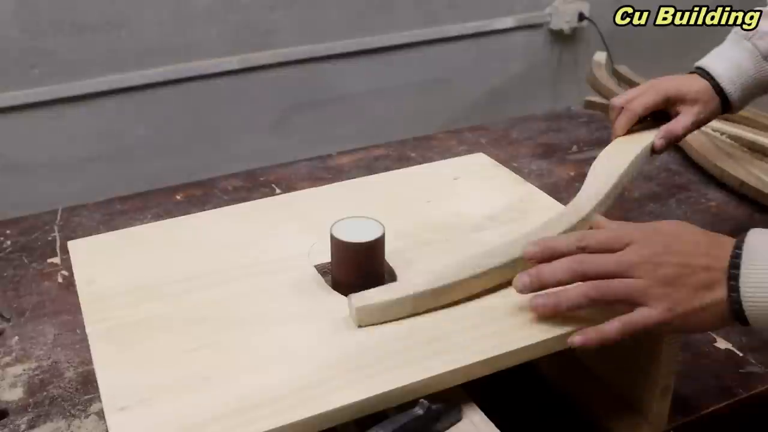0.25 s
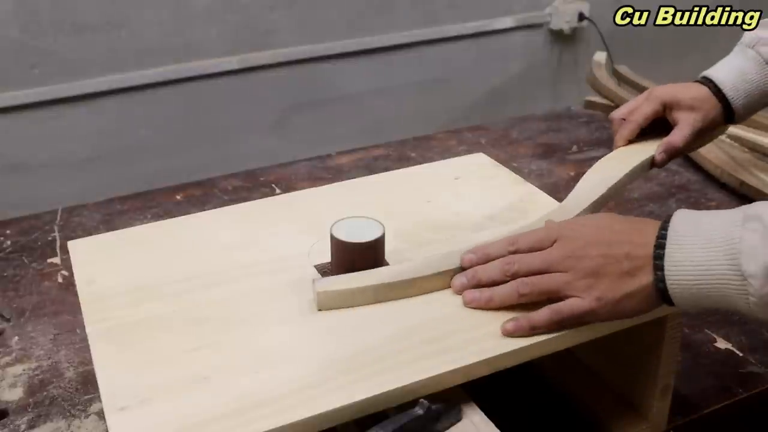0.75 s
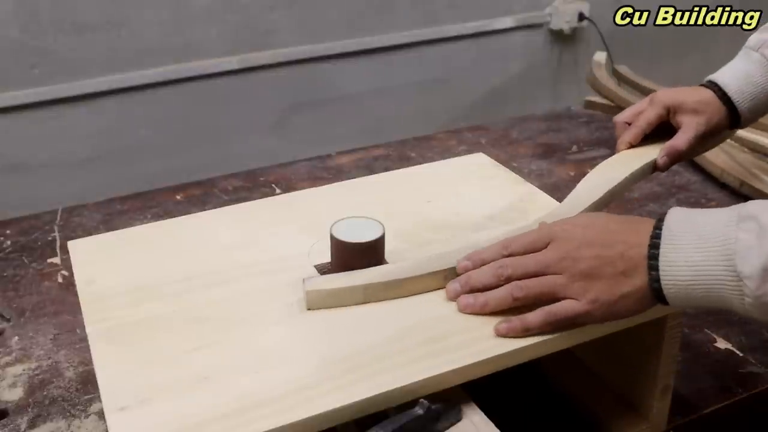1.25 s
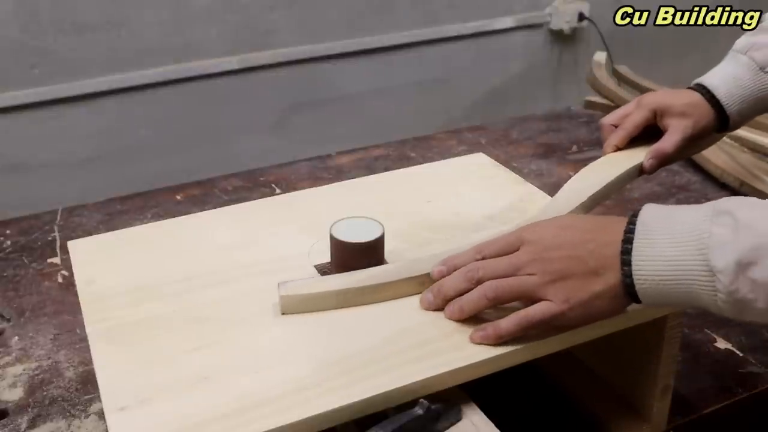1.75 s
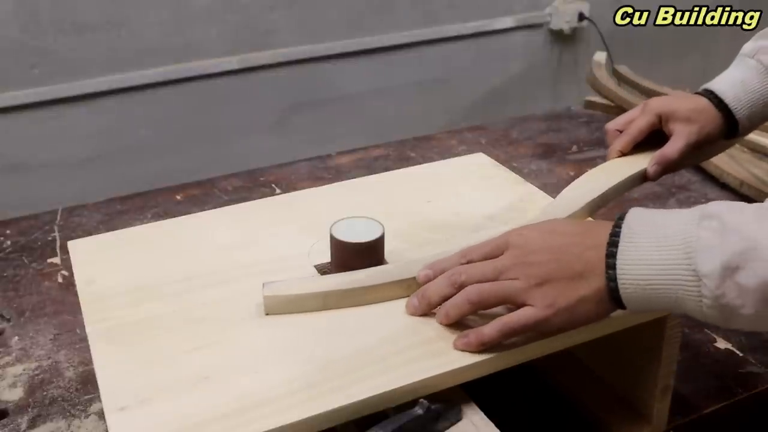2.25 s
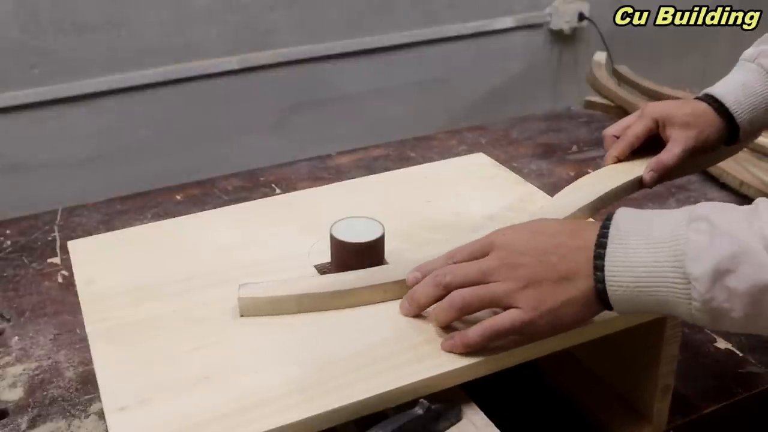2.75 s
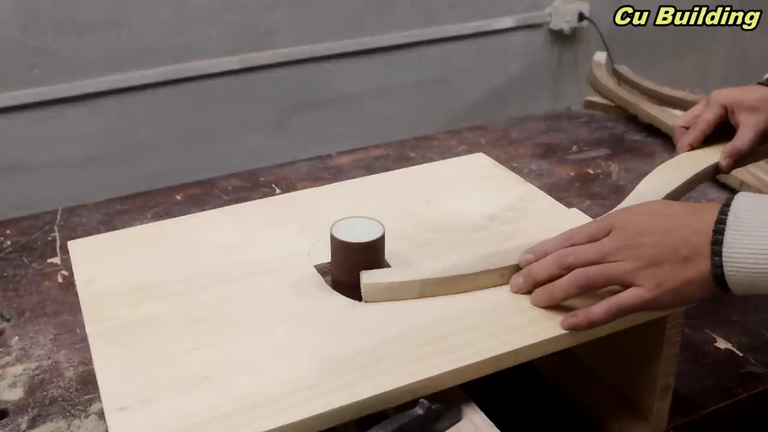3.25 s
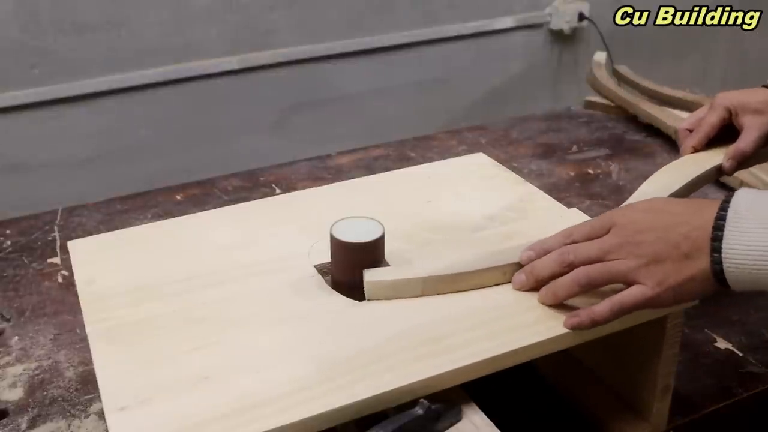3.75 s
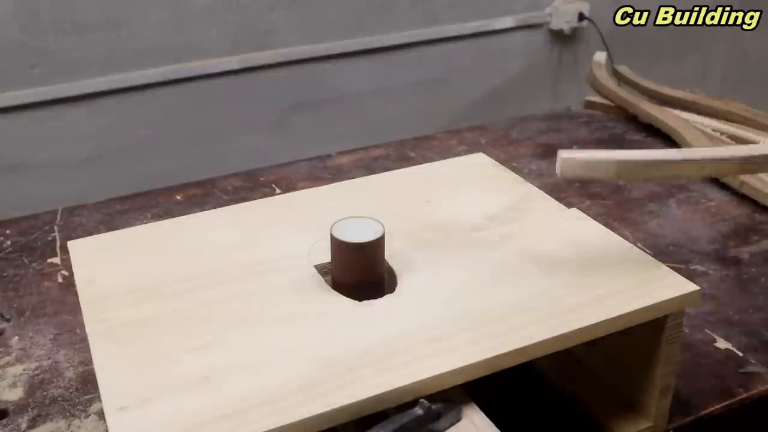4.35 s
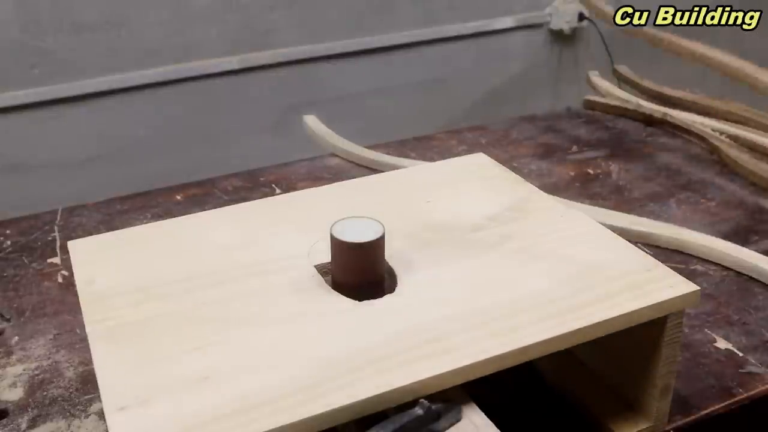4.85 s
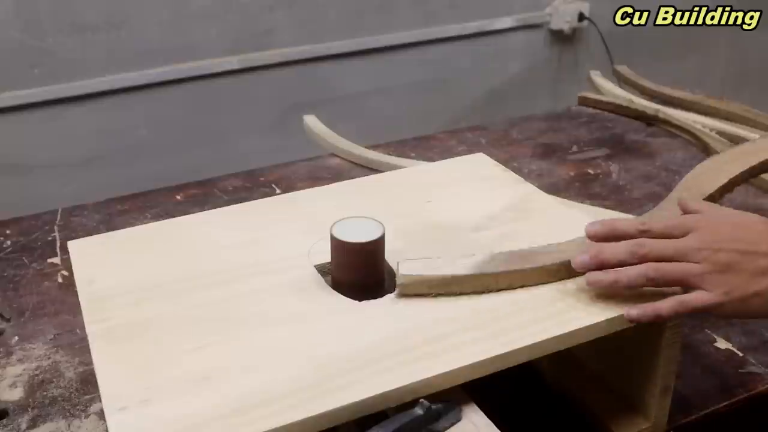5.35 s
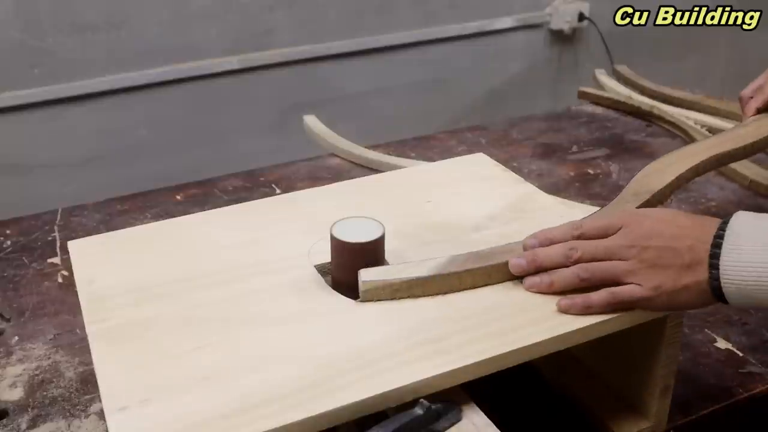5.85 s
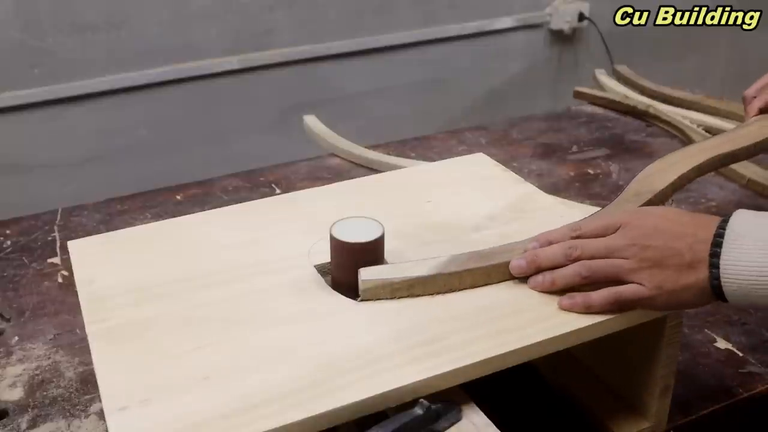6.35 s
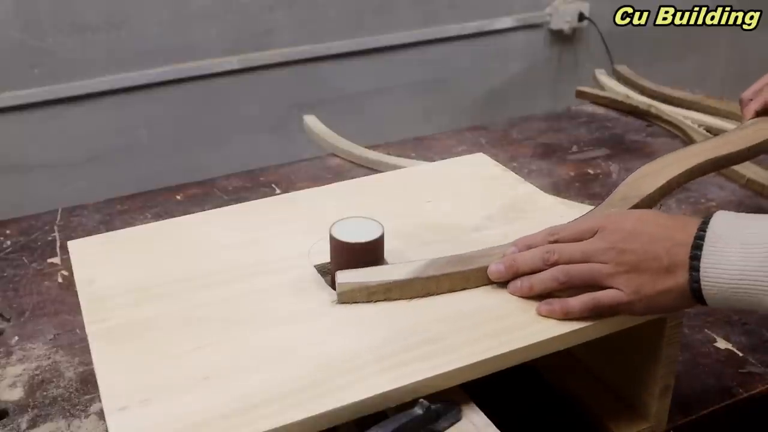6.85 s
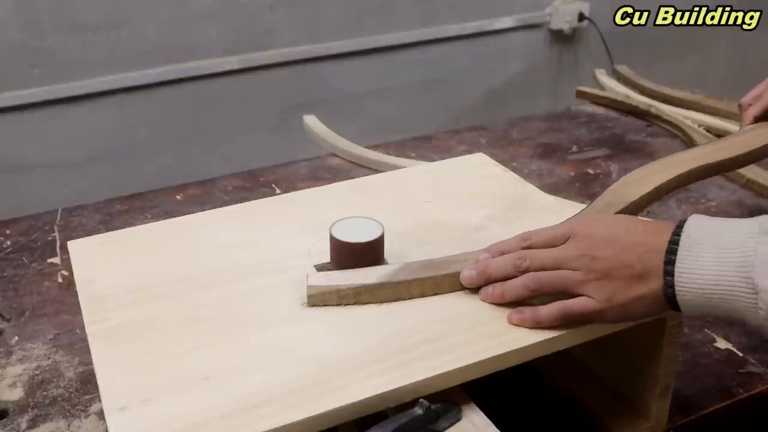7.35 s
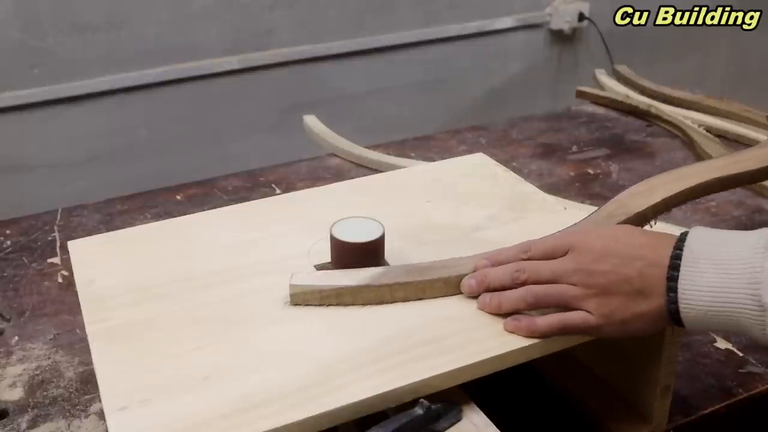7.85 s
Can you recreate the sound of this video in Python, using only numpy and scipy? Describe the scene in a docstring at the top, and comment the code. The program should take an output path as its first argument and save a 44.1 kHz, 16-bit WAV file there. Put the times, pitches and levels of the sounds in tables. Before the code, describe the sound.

High motor whine and fan hiss in a workshop; two wooden pieces are sanded in turn, the first tossed clattering onto others.

```python
"""A sanding drum whines in a workshop, on a fast router motor under a plywood table; its fan rushes and hisses.
Wood slides and bumps over the table, then two curved pieces are pressed against the drum in turn:
the motor sags, its overtones swell with load, and noise through wood resonances makes the grit rasp.
The first piece clatters onto a pile, as clicks ringing wood modes; the second is pushed so hard it chatters.
Tones follow one shaft angle; air and rumble are banded noise. The recorder's gain control ducks loud sound."""
import sys
import numpy as np
from scipy import signal
from scipy.io import wavfile
from scipy.ndimage import uniform_filter1d

SR = 44100
rng = np.random.default_rng(int(sys.argv[2]) if len(sys.argv) > 2 else 0)


def persist_wave(psi):
    """Save psi, clipped to +-1, as 16-bit WAV."""
    counts = np.round(np.clip(psi, -1, 1) * 32767).astype(np.int16)
    wavfile.write(sys.argv[1], SR, np.atleast_2d(counts).T)


N = 357651

IDLE_HZ, LOADED_HZ = 460, 400   # shaft turns per second, running free and under full load


def motor(angle, speed, load, push):
    """Unbalance hums once a turn; bearing balls pass 3.7 times a turn and mix with the shaft rate into side lines."""
    # Strong lines swell and fade as the shaft rate carries them through resonances of table and room.
    # Each row: shaft rate in turns per second, level in dB ahead of any push or waver.
    hum_levels = [(398, -44), (419, -33), (422, -28), (426, -29), (430, -32), (436.5, -41.5), (438, -38),
                  (440, -31), (445, -28.5), (448, -30), (454.5, -45), (458, -35), (460, -32.5)]              # unbalance, once a turn
    twice_levels = [(398.0, -36.5), (403.0, -28.5), (422.0, -36), (436.0, -33.5), (439.0, -48),
                    (445.0, -40.5), (460.0, -51.5)]          # twice a turn
    bearing_levels = [(398.0, -38), (416.0, -28), (426.0, -35), (436.5, -34), (438.0, -41.5), (442.0, -44),
                      (445.0, -37.5), (448.0, -32), (458.0, -33.5), (460.0, -34.5)]      # the balls passing
    overtone_levels = [(398.0, -36.5), (409.0, -45.4), (426.0, -44), (448.0, -53.5), (451.0, -43),
                       (460.0, -48)]    # twice the ball rate
    whistle_levels = [(398.0, -34.5), (409.0, -47), (422.0, -34), (426.0, -46), (445.0, -37), (460.0, -45)]      # three times the ball rate
    low_side_levels = [(398.0, -48), (426.0, -46.8), (436.0, -40.5), (445.0, -43), (451.0, -52.5),
                       (460.0, -56)]    # ball rate minus shaft rate
    high_side_levels = [(398.0, -52), (430.0, -46.8), (433.0, -59), (445.0, -40), (448.0, -43),
                        (460.0, -44.5)]  # twice the ball rate minus shaft rate
    # Brief dips and swells of the bearing's lines. Each row: start in seconds, length in seconds,
    # change of the whine (ball rate) in dB, change of the whistle in dB.
    waver_rows = [(-.1, .35, 0.5, -6), (0.208, .83, -9, 0), (1.3, .18, 2.5, 0), (2.63, .22, -9, 5.5),
                  (4.58, .48, 1, -7), (5.03, 0.24, -4.5, 3), (5.26, .4, 0, 4), (5.606, 0.63, -4.5, 1.5),
                  (6.724, 0.18, -10, 0), (7.25, 0.4, -5.5, -3)]
    # Resonances of the motor casing. Each row: frequency in Hz, width in Hz, lift in dB.
    casing_modes = [(1176, 35, 11.5), (1260, 16, 11), (1297, 29, 12.5), (1400, 20, 7.5), (2307, 29, 8),
                    (2278, 31, 10), (2576, 205, 15.5), (3205, 42, 9), (3260, 48, 1), (3700, 89, 2),
                    (4260, 81, 7), (4630, 115, 5), (6100, 130, 10), (6040, 83, -3)]
    # Weaker shaft and bearing lines, ahead of the casing. Each row: multiple of the shaft rate,
    # level in dB idling, in dB under half load, in dB under full load.
    weak_lines = [(.366, -73.5, -73, -73), (1.565, -55, -54, -73), (1.77, -54, -66, -62),
                  (2.33, -55.5, -66, -59), (2.565, -58, -60, -58), (3, -67.5, -57.5, -46),
                  (3.08, -56, -68, -80), (3.565, -53, -54.5, -74), (4, -50.5, -47.5, -40.5),
                  (4.7, -83, -57, -46.5), (5, -76, -50, -55), (5.4, -77, -55.5, -51),
                  (5.7, -65.5, -54.5, -51), (6.27, -58, -65, -63), (6.7, -55.5, -48.5, -53),
                  (6.81, -67, -54.5, -60), (7, -69, -63, -50), (8.4, -58, -52, -50), (9.1, -56, -53, -45),
                  (9.4, -57, -47.5, -51), (10.1, -69, -51, -45), (11, -67, -58, -48), (12.8, -67, -46, -49),
                  (13.1, -67, -60, -51), (13.8, -49.5, -60, -64), (14.8, -65, -63, -67),
                  (18.5, -50, -58, -77)]
    ball_pass = 3.7       # balls per turn
    push_db = 17          # lift of the twice-a-turn and low side lines per unit of push
    hum_build_s = 0.024   # the hum's resonances follow the speed this much later
    waver_fade_s = 0.062
    weak_lines_db = 1.6   # how well the casing radiates weak lines away from its resonances

    def by_speed(points):
        return np.interp(speed, *np.transpose(sorted(points)))

    whine_db, whistle_db = 0, 0
    for s, length_s, whine_change_db, whistle_change_db in waver_rows:
        waver = swell(s, length_s, waver_fade_s, waver_fade_s)
        whine_db = whine_db + whine_change_db * waver
        whistle_db = whistle_db + whistle_change_db * waver

    t = np.arange(N) / SR
    hum_db = np.interp(t - hum_build_s, t, by_speed(hum_levels))
    out = partial(angle, 1, hum_db, flutter_db=0.9)
    out += partial(angle, 2, by_speed(twice_levels) + push_db * push, flutter_db=1.6)
    out += partial(angle, ball_pass, by_speed(bearing_levels) + whine_db, flutter_db=1.6)
    ball_lines = [
        (2 * ball_pass, by_speed(overtone_levels)),
        (3 * ball_pass, by_speed(whistle_levels) + whistle_db),
        (ball_pass - 1, by_speed(low_side_levels) + push_db * push),
        (2 * ball_pass - 1, by_speed(high_side_levels))]
    for multiple, level_db in ball_lines:
        out += partial(angle, multiple, level_db, flutter_db=2.0)

    # a weak line swells while its pitch crosses a resonance of the casing
    grid_hz = np.arange(0, SR / 2, 4)
    lift_db = sum(db / (1 + (2 * (grid_hz - hz) / width) ** 2) for hz, width, db in casing_modes)
    for multiple, *by_load_db in weak_lines:
        level_db = np.interp(load, [0, .5, 1], by_load_db) + np.interp(multiple * speed, grid_hz, lift_db)
        out += partial(angle, multiple, level_db + weak_lines_db, flutter_db=2.5)
    return out


def air(rush_top_hz=9200, housing_db=-7.5, rush_db=-30, hiss_db=-42.5):
    """The cooling fan's rush, partly ringing in the housing, with a fine hiss on top."""
    # Spectra of rush and hiss. Each row: frequency in Hz, relative level in dB per Hz.
    rush_spectrum = [(330, -12.5), (550, -9), (780, -10), (980, -5), (1400, -5.5), (2000, -3.5),
                     (2500, 0.5), (3200, -2), (4500, -0.5), (6000, 2), (7500, -2.5), (9000, -4)]
    hiss_spectrum = [(7000, -24), (9000, 1), (10500, 0), (12000, 1), (16000, -2)]
    # Resonances of housing and table in the air stream. Each row: frequency in Hz, width in Hz, relative dB.
    housing_modes = [(847, 24, -3.5), (1180, 11, 0), (1580, 76, -1.5), (2253, 34, 4), (2545, 100, 2),
                     (2790, 180, -3), (3540, 19, -22), (3580, 65, 9.5), (4320, 390, 5), (5030, 43, -3),
                     (5930, 56, 2)]
    low_pass = signal.butter(8, rush_top_hz, fs=SR, output="sos")
    open_rush = near_walls(signal.sosfilt(low_pass, banded_noise(rush_spectrum, patchy_db=.5)))
    housed_rush = from_db(housing_db) * band(hollow_noise(housing_modes), 620, 11700)
    hiss = banded_noise(hiss_spectrum, patchy_db=1.25)
    return from_db(rush_db) * (open_rush + housed_rush) + from_db(hiss_db) * hiss


def rasp(angle, pressure, bite=0.75, idle_db=-44, rise_db=10.5):
    """Grit tears at the wood, louder with pressure and hardest where the high side of the drum comes round."""
    # Resonances of wood and table under the grit. Each row: frequency in Hz, width in Hz, relative dB.
    rasp_modes = [(393, 125, -4.5), (501, 50, 0), (627, 12.4, 2.5), (708, 60, -2), (827.5, 43, 7),
                  (1069, 26, 5), (1210, 70, 3), (1270, 130, 0.5), (1620, 270, 3.5)]
    grip = np.sqrt(pressure)
    tearing = hollow_noise(rasp_modes) * (1 + bite * grip * np.cos(angle))
    level_db = idle_db + rise_db * grip   # with no pressure the free sleeve only stirs the air
    return from_db(level_db) * band(band(tearing, 265, 2960), 265, 2960)


def grit_buzz(angle, load, level_db=-52, rise_db=14, full_load=0.6, top_hz=8000):
    """The same grains come round on every turn: a thin buzz on the shaft's multiples that grows with load."""
    turn = np.linspace(0, 2 * np.pi, 1024, endpoint=False)
    sleeve = sum(np.sin(k * turn + rng.uniform(0, 2 * np.pi)) for k in range(8, 27))
    buzz = band(np.interp(angle, turn, rms_one(sleeve), period=2 * np.pi), 1300, top_hz)
    return from_db(level_db + rise_db * np.minimum(load / full_load, 1)) * buzz


def table(bump_s=0.028, motor_rumble_db=-64.5, slide_fade_s=0.079):
    """The plywood box rumbles, thuds where the wood bumps it and groans where wood slides over it."""
    # Rumble of the table. Each row: frequency in Hz, relative level in dB per Hz.
    rumble_spectrum = [(25, -32), (50, -13), (80, -13.5), (115, -5.5), (165, 1), (210, -3.5), (260, -8.5),
                       (330, -5.5)]
    # Wood bumping the table. Each row: time in seconds, level in dB.
    bump_rows = [(.19, -57), (.37, -55), (6.51, -52), (7.0, -55), (7.19, -47), (7.25, -46), (7.60, -53)]
    # Wood sliding on the table top. Each row: start in seconds, length in seconds, groan in dB, rumble in dB.
    slide_rows = [(0.07, 0.35, -50, -57), (.38, 0.62, -62.5, -59.5), (0.914, 0.5, -51.5, -62),
                  (1.36, 1.17, -66, -66), (2.75, 0.28, -50.5, -78), (5.45, 2.7, -83, -75)]
    groan_gain = 0
    rumble_gain = from_db(motor_rumble_db)   # shaken by the motor alone
    for s, length_s, groan_db, rumble_db in slide_rows:
        sliding = swell(s, length_s, slide_fade_s, slide_fade_s)
        groan_gain = groan_gain + from_db(groan_db) * sliding
        rumble_gain = rumble_gain + from_db(rumble_db) * sliding
    groan = rms_one(resonate(resonate(rng.standard_normal(N), 308, 27), 308, 27))
    thud_gain = signal.lfilter([1], [1, -np.exp(-1 / (bump_s * SR))], clicks(bump_rows) + 1e-18)
    return (rumble_gain + thud_gain) * banded_noise(rumble_spectrum, patchy_db=2.0) + groan_gain * groan


def squeal(angle, fade_s=0.045):
    """Now and then the wood sticks and slips on the drum, locked to a multiple of the shaft rate."""
    # Each row: start in seconds, length in seconds, multiple of the shaft rate, level in dB.
    squeal_rows = [(4.02, .22, 13, -37.5), (6.99, .17, 3, -35)]
    out = 0
    for s, length_s, multiple, level_db in squeal_rows:
        out = out + swell(s, length_s, fade_s, fade_s) * partial(angle, multiple, level_db, flutter_db=2.5)
    return out


def knocks(tail_s=0.025, tail_db=-29, rattle_per_s=330, rattle_db=-30):
    """Each blow and its dense reflections ring the wood's modes, with a dry crack; the pile rattles briefly."""
    # The finished piece lands on the pile. Each row: time in seconds, level of the blow in dB.
    blow_rows = [(4.6825, -16), (4.691, -9), (4.6935, -11.5), (4.7415, -15), (4.7455, -17), (4.7565, -18),
                 (4.771, -22), (4.793, -26)]
    # Modes of the piece. Each row: frequency in Hz, relative level in dB, time to fall 60 dB in seconds.
    wood_modes = [(235, -29, .12), (325, -25, .14), (560, -21, .06), (720, -18, .06), (1090, -14, .05),
                  (1400, -8, .05), (1820, -4, .06), (2250, -7, .03), (2650, -3, .03), (3150, -4, .025),
                  (3900, -6, .025), (5050, -6, .025), (5750, -6, .025), (7400, -9, .02)]
    touches = (rng.random(N) < rattle_per_s / SR) * rng.uniform(-1, 1, N)
    rattle = from_db(rattle_db) * swell(4.74, .09, .01, .06) * touches
    blows = clicks(blow_rows) + rattle
    tail = signal.lfilter([1], [1, -np.exp(-1 / (tail_s * SR))], np.abs(blows) + 1e-18)
    reflections = tail * rng.standard_normal((2, N))
    force = blows + from_db(tail_db) * spread(*reflections, 2000)
    modes = 0
    for k, (hz, db, t60) in enumerate(wood_modes):
        modes = modes + (-1) ** k * from_db(db - 10) * ring(force, hz, t60)
    crack = from_db(8.5) * band(force, 2000, 8000)
    return band(modes, 220, 10000) + crack   # a slim piece radiates no bass


def chatter(angle, slip=.912, wander=0.24, level_db=-44.5):
    """Under hard pressure the wood bounces a little slower than the drum turns and shakes the table."""
    level = from_db(level_db) * swell(start_s=6.3, length_s=1.27, attack_s=0.56, release_s=.1)
    bounce = np.sin(slip * angle + wander * drift(7.4)) * from_db(6.0 + 1.0 * drift(12))
    shake = rms_one(band(band(rng.standard_normal(N), 453, 545), 430, 540))
    return level * (bounce + from_db(4.5) * shake)


def partial(angle, multiple, level_db, flutter_db):
    """One line locked to the shaft; its strength flutters."""
    phase = multiple * angle + rng.uniform(0, 2 * np.pi)
    gain = np.sqrt(2) * from_db(level_db + flutter_db * drift(13.7))
    return gain * spread(np.sin(phase), np.cos(phase), multiple * IDLE_HZ)


def banded_noise(spectrum, patchy_db):
    """Third-octave bands of stereo noise, each flickering on its own; rms 1 in the middle."""
    out, edges = 0, 25 * 2 ** (np.arange(30) / 3)
    white = rng.standard_normal((2, 2, N))   # neighbouring bands take turns on two sources
    for k, (low, high) in enumerate(zip(edges, edges[1:])):
        if high > spectrum[0][0] and low < spectrum[-1][0]:
            hz = np.sqrt(low * high)
            gain = from_db(at_hz(spectrum, hz) + patchy_db * drift(18.5))
            out = out + gain * spread(*band(white[k % 2], low, high), hz)
    return out / np.std(out.mean(axis=0))


def hollow_noise(modes):
    """Stereo noise ringing in a set of resonances; rms 1."""
    white = rng.standard_normal((2, N))
    out = 0
    for k, (hz, width, db) in enumerate(modes):
        out = out + (-1) ** k * from_db(db) * spread(*resonate(white, hz, width), hz)
    return rms_one(out)


def near_walls(x):
    """Early echoes from bench and wall ripple the spectrum while about keeping its power."""
    echo_gain = .17
    delays = (rng.uniform(.002, .022, 9) * SR).astype(int)
    echoes = sum((-1) ** k * np.pad(x, ((0, 0), (lag, 0)))[:, :N] for k, lag in enumerate(delays))
    return (x + echo_gain * echoes) / np.sqrt(1 + len(delays) * echo_gain ** 2)


def spread(mid, side, hz):
    """Left and right from mid and side; the side's share depends on frequency and is largest at the top."""
    # Stereo width at the microphones. Each row: frequency in Hz, side minus mid in dB.
    width_points = [(60, -7), (110, -27), (200, -7), (380, -22), (700, -13), (1290, -14), (2380, -7.5),
                    (4400, -10.5), (8120, -2), (15000, 5.5)]
    return mid + from_db(at_hz(width_points, hz)) * side * np.array([[1], [-1]])


def from_db(db):
    """Decibels to gain."""
    return 10 ** (np.asarray(db) / 20)


def rms_one(x):
    """Scale to rms 1."""
    return x / np.sqrt(np.mean(x ** 2) + 1e-20)


def in_time(rows):
    """Each column of a curve at every sample."""
    s, *columns = np.transpose(rows)
    return [np.interp(np.arange(N) / SR, s, c) for c in columns]


def at_hz(points, hz):
    """Read a spectrum on a log-frequency axis."""
    return np.interp(np.log(hz), np.log(np.array(points)[:, 0]), np.array(points)[:, 1])


def drift(rate):
    """Smooth chance of spread 1 that changes about rate times a second."""
    r = np.exp(-80 * np.pi * rate / SR)   # drawn at every 40th sample
    slow = signal.lfilter([1], [1, -2 * r, r * r], rng.standard_normal(N // 40 + 2002))[2000:]
    return np.interp(np.arange(N) / 40, np.arange(len(slow)), rms_one(slow))


def band(x, low_hz, high_hz):
    """Butterworth band-pass."""
    edges = [low_hz, min(high_hz, .49 * SR)]
    return signal.sosfilt(signal.butter(2, edges, "band", fs=SR, output="sos"), x)


def resonate(x, hz, width_hz):
    """A resonance with gain 1 on top."""
    r = np.exp(-np.pi * width_hz / SR)
    zeros = np.array([1, 0, -1]) * (1 - r * r) / 2
    return signal.lfilter(zeros, [1, -2 * r * np.cos(2 * np.pi * hz / SR), r * r], x)


def ring(x, hz, t60):
    """A unit click sets a decaying sine of starting height 1 ringing."""
    r, w = from_db(-60 / (t60 * SR)), 2 * np.pi * hz / SR
    return signal.lfilter([0, np.sin(w)], [1, -2 * r * np.cos(w), r * r], x + 1e-18)


def clicks(events):
    """One impulse for each row of time in seconds and level in dB."""
    out = np.zeros(N)
    for s, level_db in events:
        out[round(s * SR)] = from_db(level_db)
    return out


def swell(start_s, length_s, attack_s, release_s):
    """Gain that rises, holds at 1 if there is time, and falls."""
    t = np.arange(N) / SR - start_s
    return np.clip(np.minimum(t / attack_s, (length_s - t) / release_s), 0, 1)


def lagged(x, time_s):
    """One-pole smoothing with gain 1."""
    r = np.exp(-1 / (time_s * SR))
    return signal.lfilter([1 - r], [1, -r], x)


def scene():
    """The motor slows as the wood loads it; the pressure on the grit runs a little ahead of that load."""
    # The shaft, braked by the wood. Each row: time in seconds, turns per second.
    speed_curve = [(0.0, 455.9), (0.93, 458.6), (1.05, 455.2), (1.24, 444.0), (1.39, 448.8), (1.67, 428.8),
                   (1.94, 422.3), (2.05, 433.3), (2.5, 422.6), (2.67, 439.0), (2.9, 435.1), (3.09, 446.3),
                   (3.45, 453.3), (3.73, 442.1), (3.84, 443.9), (4.2, 429.6), (4.38, 446.6), (4.64, 455.8),
                   (5.16, 459.3), (5.78, 459.9), (5.94, 449.6), (6.14, 451.8), (6.49, 420.6), (6.98, 402.5),
                   (7.33, 397.8), (7.52, 405.2), (7.64, 428.2), (7.79, 425.8), (7.96, 436.5), (8.11, 433.0)]
    # The grit catches the wood and bites harder. Each row: start in seconds, length in seconds,
    # extra pressure as a share of the full pressure, 0-1.
    bite_rows = [(.92, 0.36, 0.32), (1.36, 0.25, 0.17), (3.416, 0.35, 0.18), (3.966, .16, 0.15),
                 (5.796, 0.16, 0.36), (6.878, 0.26, 0), (7.682, .1, .2), (7.897, 0.2, 0.04)]
    speed_lag_s = 0.098   # the speed follows the hand's pressure this much later
    bite_fade_s = 0.053
    speed, = in_time(speed_curve)
    load = np.clip((IDLE_HZ - speed) / (IDLE_HZ - LOADED_HZ), 0, 1)
    bites = sum(extra * swell(s, length_s, bite_fade_s, bite_fade_s) for s, length_s, extra in bite_rows)
    # push is the pressure beyond the load
    push = speed_lag_s * SR * np.gradient(uniform_filter1d(load, size=2000)) + bites
    pressure = np.clip(load + push, 0, 1)
    unsteady = (.0002 + .0009 * np.sqrt(load)) * drift(25)
    angle = 2 * np.pi * np.cumsum(speed * (1 + unsteady)) / SR

    tones = motor(angle, speed, load, push) + grit_buzz(angle, load) + squeal(angle) + chatter(angle)
    # tones and air lean slightly to the right
    placed_tones = tones * from_db([[-.2], [.2]])
    placed_air = air() * from_db([[-.6], [.6]])
    return placed_tones + placed_air + rasp(angle, pressure) + table() + knocks()


def record(dry):
    """The recorder's gain control ducks quickly on anything loud and recovers slowly; the top is cut steeply."""
    threshold_db, squeeze = -25, 0.83   # squeeze: share of the excess that is taken away
    detect_s, attack_s, recover_db_per_s = .005, .009, 3.5
    level_db = 10 * np.log10(lagged(np.mean(dry ** 2, axis=0), detect_s) + 1e-12)
    wanted_db = squeeze * np.maximum(level_db - threshold_db, 0)
    # a running maximum on a rising ramp lets the ducking fall no faster than the ramp
    recovery_db = recover_db_per_s * np.arange(N) / SR
    duck_db = np.maximum.accumulate(wanted_db + recovery_db) - recovery_db
    ducked = dry * from_db(-lagged(duck_db, attack_s))
    top_cut = signal.ellip(12, .2, 80, 15850, fs=SR, output="sos")   # cutoff in Hz
    return signal.sosfilt(top_cut, ducked)


dry = scene()
out = record(dry)
persist_wave(out)
```